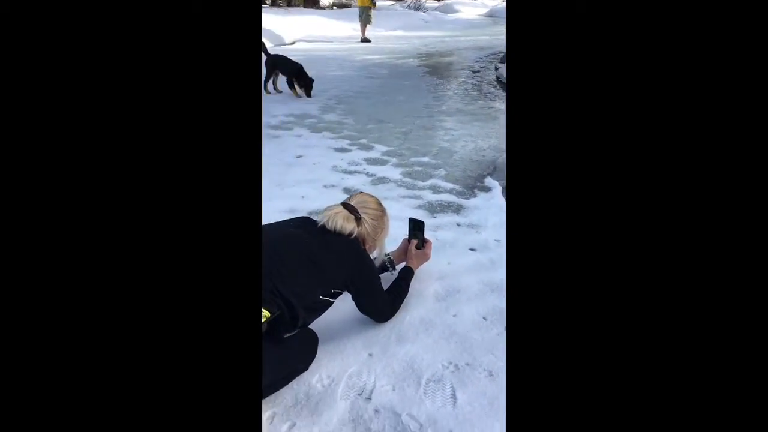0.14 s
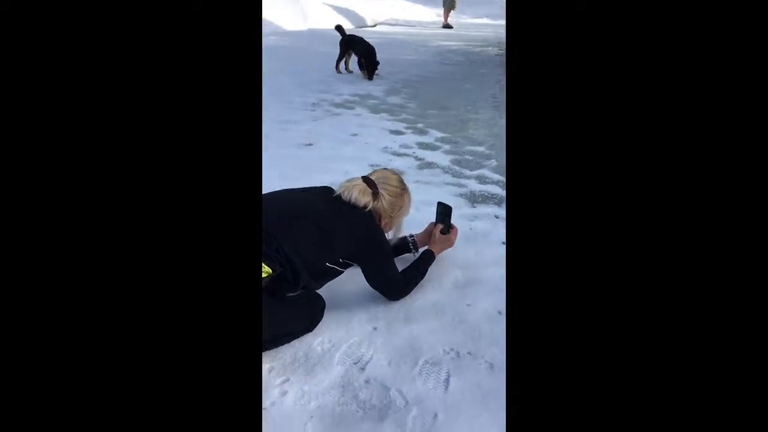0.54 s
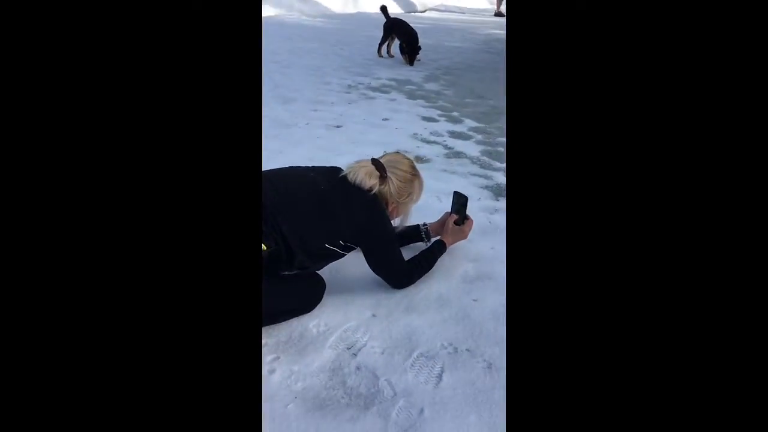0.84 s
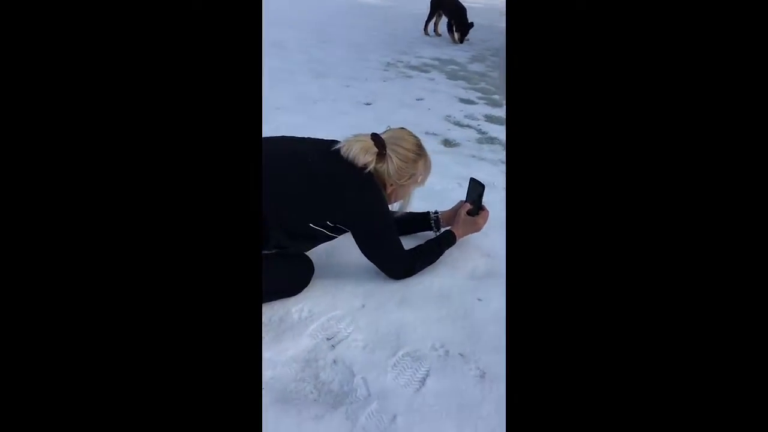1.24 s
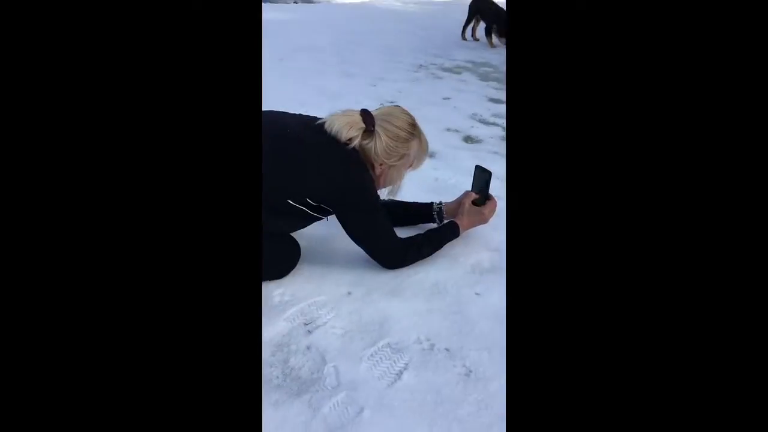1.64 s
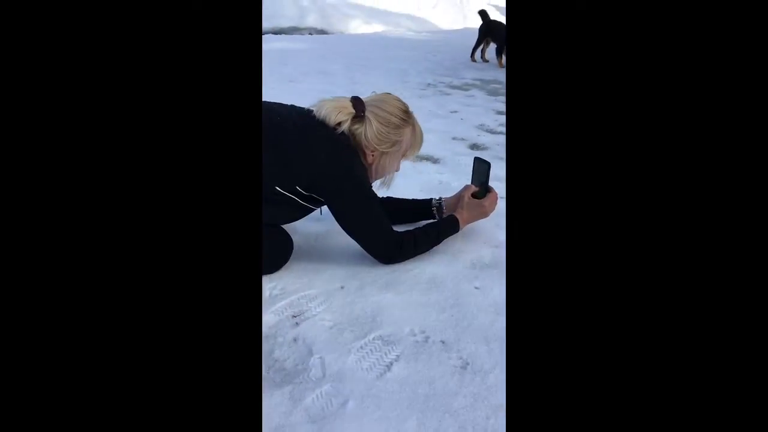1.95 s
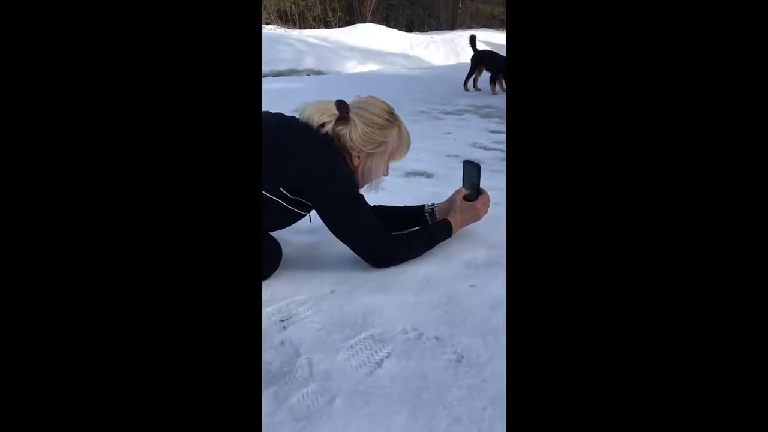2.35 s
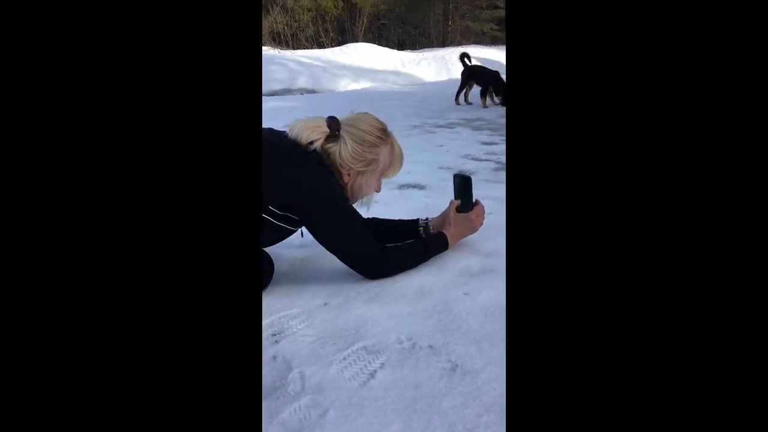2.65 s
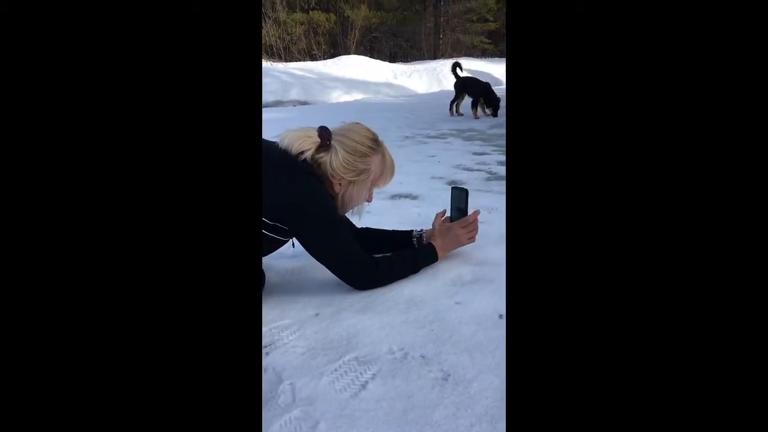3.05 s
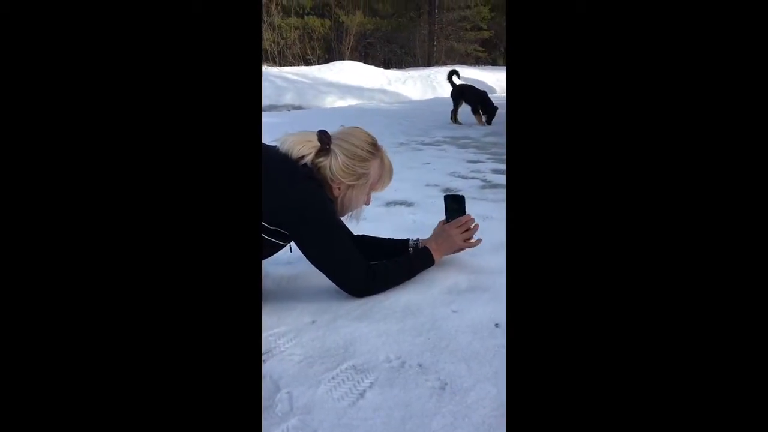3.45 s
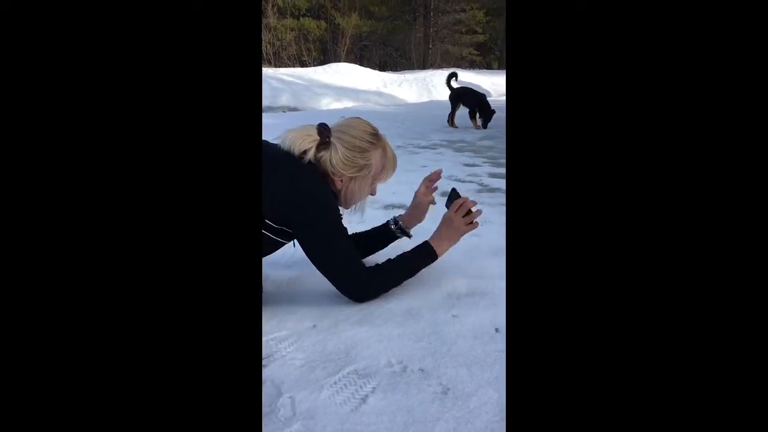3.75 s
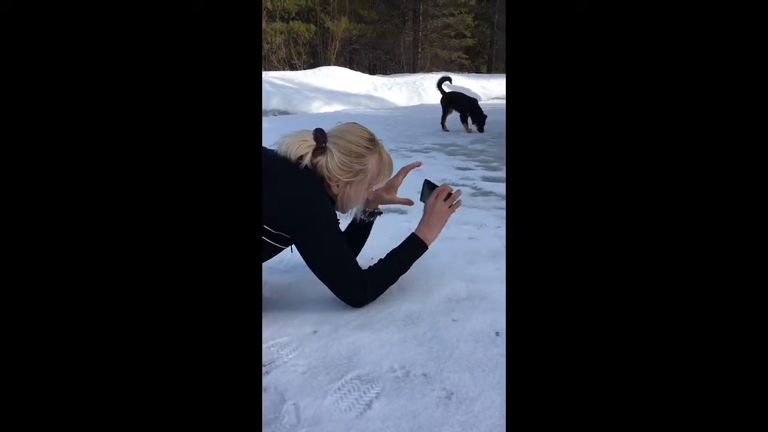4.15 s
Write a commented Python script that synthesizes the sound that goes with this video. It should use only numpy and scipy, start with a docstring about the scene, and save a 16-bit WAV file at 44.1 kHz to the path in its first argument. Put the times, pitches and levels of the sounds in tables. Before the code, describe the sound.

A dry, close, echo-free sound of crusty snow giving way underfoot: small crackles first, then stronger scrapes, one prominent snap, and a dense run of crunches. After the first two seconds the movement stops, leaving quiet open air, a gentle low wind rumble, very light scuffing, a smooth rub and a few minute clicks.

```python
"""A light wind and the hiss of the open air are heard first; at once boots shift their weight on crusty snow.
The crust scrapes and snaps grain by grain, gives way once with a sharp crack, and then the boots stand still.
Afterwards only light scuffs, a soft rub and a few tiny ticks are left.
Random grain impulses, ringing crumbs and coloured noise make the scrapes and collapses;
damped partials, noise bursts and falling tones make the cracks; filtered noise makes the rub, wind and air."""
import sys
import numpy as np
from scipy import signal
from scipy.io import wavfile
from scipy.ndimage import uniform_filter1d

SR = 44100
rng = np.random.default_rng(int(sys.argv[2]) if len(sys.argv) > 2 else 0)


def wav_record(signal):
    """Record a signal, one row per channel, as 16-bit PCM in the file named by sys.argv[1]."""
    frames = np.transpose(np.atleast_2d(signal))
    bounded = np.clip(frames, -1, 1)
    # unit amplitude maps onto the largest positive 16-bit level
    quanta = np.round(bounded * 32767).astype(np.int16)
    wavfile.write(sys.argv[1], SR, quanta)


N = 189453
TIME = np.arange(N) / SR

# Spectrum of crust being crushed: (frequency [Hz], relative density [dB])
CRUNCH_SPECTRUM = [(60, -21.5), (190, -3), (400, -8.5), (580, -4), (800, -7.5), (1130, -9.5), (1400, -10),
                   (1680, -8.5), (2100, -14.5), (2950, -15.5), (3700, -21.5), (4900, -25.5), (6300, -25.5),
                   (16000, -36.5)]
# Spectrum of ice crystals brushing past each other: (frequency [Hz], relative density [dB])
HISS_SPECTRUM = [(1500, -20), (3300, -5.5), (4900, -5), (6200, -1.5), (9000, -1), (10400, -2.5), (13000, 1),
                 (16000, -4)]
# Spectrum of the bright tick of a break: (frequency [Hz], relative density [dB])
EDGE_SPECTRUM = [(900, -11), (2100, -0.5), (2900, 6), (3700, -1), (4900, -3.5), (6500, -2), (10400, -7),
                 (16000, -3.5)]
# Load on the crust while the weight shifts: (time [s], load [dB])
LOAD_CURVE = [(0.0, -102), (0.11, -97), (0.24, -66), (0.42, -64), (0.49, -65.5), (0.619, -63),
              (0.76, -76.5), (0.89, -61), (0.99, -67), (1.22, -84), (1.28, -58.5), (1.37, -67.5),
              (1.46, -64.5), (1.69, -70), (1.798, -62), (1.939, -71), (2.069, -75), (2.151, -82.5)]


def amp(db):
    """Level law: decibels to an amplitude ratio."""
    return 10 ** (np.asarray(db) / 20)


def unit(x):
    """Power normalisation: scales to rms 1."""
    return x / np.sqrt(np.mean(x ** 2) + 1e-20)


def peaked(x):
    """Peak normalisation: scales to a peak of 1."""
    return x / (abs(x).max() + 1e-20)


def add(mix, s, sound):
    """Superposition: adds a sound to the mix at time s."""
    part = mix[max(0, round(s * SR)):][:len(sound)]
    part += sound[:len(part)]


def colour(x, points, size=4096):
    """Minimum-phase filtering: a causal response of unit energy with the given spectrum."""
    hz, db = np.transpose(points)
    bin_hz = abs(np.fft.fftfreq(size, 1 / SR))
    log_gain = np.log(amp(np.interp(np.log(bin_hz + 1), np.log(hz), db)))
    # the Hilbert transform of the log gain gives the phase of a causal filter
    spectrum = np.exp(signal.hilbert(log_gain).conj())
    pulse = np.fft.ifft(spectrum).real[:size // 2]
    return signal.fftconvolve(x, pulse / np.linalg.norm(pulse))[:len(x)]


def grains(per_s, spread_db, powder):
    """Shot noise: ice bonds break at random, a few big, many small, over a smooth share of powder."""
    sizes = amp(spread_db * np.minimum(rng.exponential(1, N), 3))
    signs = rng.choice([-1, 1], N)
    breaks = sizes * signs * (rng.random(N) < per_s / SR)
    return unit(unit(breaks) + powder * rng.standard_normal(N))


def splinter(t, decay_s, debris):
    """Brittle fracture: one sharp break with a decaying spray of smaller ones."""
    spray = debris * rng.standard_normal(len(t)) * np.exp(-t / decay_s)
    return (t == 0) + spray


def crumbs(centre_hz, spread_octaves, cycles, per_s, count=12):
    """Damped resonance: crumbs of many sizes break at random, each ringing briefly at its own pitch."""
    out, t = np.zeros(N), np.arange(1024) / SR
    for place in np.linspace(-1, 1, count):
        hz = centre_hz * 2 ** (spread_octaves * place)
        age = hz * t / cycles
        ring = age * np.exp(-2 * age) * np.sin(2 * np.pi * hz * t)
        breaks = grains(per_s / count, spread_db=3, powder=0)
        out += np.cos(place) * signal.oaconvolve(breaks, ring)[:N]  # the middle pitch is strongest
    return unit(out)


def outdoors(lump_db=1.0, air_db=-73.5):
    """Turbulent noise: lumpy low-frequency wind on the microphone over a steady hiss."""
    # Spectrum of the wind: (frequency [Hz], relative density [dB])
    wind_spectrum = [(18, -30.5), (40, 0.5), (80, 4), (130, -1), (190, -7), (270, -18), (450, -36.5),
                     (1200, -59)]
    # Spectrum of the open air: (frequency [Hz], relative density [dB])
    air_spectrum = [(30, 4.5), (300, 6), (600, 1), (1100, -1), (2000, -7), (4000, -8), (4900, -11.5),
                    (5700, -8), (10400, -9), (11400, -5), (16000, -7.5)]
    # Strength of the wind: (time [s], rms level [dB])
    gusts = [(0, -67), (0.1, -61.5), (0.3, -68), (0.75, -71.5), (1.2, -63), (1.6, -69), (1.997, -64),
             (2.55, -61), (3.15, -66), (3.68, -59.5), (3.95, -68), (4.3, -63)]
    s, gust_db = np.transpose(gusts)
    slow_noise = uniform_filter1d(rng.standard_normal(N), size=2000)
    lumps = unit(uniform_filter1d(slow_noise, size=1500))
    wind = unit(colour(rng.standard_normal(N), wind_spectrum) * amp(lump_db * lumps))
    air = amp(air_db) * colour(rng.standard_normal(N), air_spectrum)
    return wind * amp(np.interp(TIME, s, gust_db)) + air


def soft_rub(start_s=3.21, rise_s=0.087, top_db=-68):
    """Soft rub: smooth coloured noise swells and trails off."""
    # Spectrum of the soft rub: (frequency [Hz], relative density [dB])
    rub_spectrum = [(500, -17), (1300, -2.5), (2000, -7), (2500, -15), (3400, -10.5), (4800, -20.5),
                    (5900, -9.5), (7500, -23), (9200, -12.5), (16000, -26)]
    age = np.maximum(TIME - start_s, 0) / rise_s
    swell = (age * np.exp(1 - age)) ** 2
    return amp(top_db) * swell * colour(rng.standard_normal(N), rub_spectrum)


def ticks():
    """Impact: small hard things touch, too light to ring the crust."""
    # Tiny dry ticks: (time [s], peak level [dB])
    tick_events = [(0.5312, -32), (0.6604, -45), (2.597, -45), (2.752, -47.5), (3.7483, -51), (3.8, -43),
                   (3.854, -46), (3.867, -44), (3.9378, -38), (3.947, -44), (3.956, -46.5)]
    # Spectrum of a tick: (frequency [Hz], relative density [dB])
    tick_spectrum = [(1500, -8.5), (4500, -12), (6500, -5), (9000, -0.5), (12000, 0), (16000, 3.5)]
    out, t = np.zeros(N), np.arange(1024) / SR
    for s, db in tick_events:
        tick = colour(splinter(t, decay_s=0.0027, debris=0.25), tick_spectrum)
        add(out, s, amp(db) * peaked(tick))
    return out


def thumps(ring_s=0.0028):
    """Cavity resonance: the hollow booms briefly where the crust drops onto the snow beneath."""
    # Hollow thumps: (time [s], peak level [dB], pitch [Hz])
    thump_events = [(1.493, -48, 200), (1.855, -46, 204), (1.89, -42.5, 208)]
    out, t = np.zeros(N), np.arange(2048) / SR
    for s, db, hz in thump_events:
        boom = t * np.exp(-t / ring_s) * np.sin(2 * np.pi * hz * t)
        add(out, s, amp(db) * peaked(boom))
    return out


def load_db(settle_db_per_s=63):
    """Static loading: load on the crust at every sample, dying away when the boots come to rest."""
    s, db = np.transpose(LOAD_CURVE)
    return np.interp(TIME, s, db) - settle_db_per_s * np.maximum(TIME - s[-1], 0)


def scrapes(ease=0.56):
    """Sliding friction: pressure and speed swell, then ease off over the given share of each scrape."""
    # Scrapes of the sole, the late ones very light:
    # (start [s], length [s], swelling share of the length [1], pressure [dB], sliding speed [dB])
    strokes = [(0.044, 0.16, 0.062, -61, -69.5), (0.12, 0.2, 0.52, -59, -71.5),
               (0.301, 0.064, 0.55, -57, -90), (0.471, 0.094, 0.33, -55.5, -61),
               (0.589, 0.077, 0.3, -61, -75), (0.9, 0.06, 0.11, -83, -56), (0.923, 0.1, 0.22, -47, -59.5),
               (1.009, 0.16, 0.53, -45.5, -59.5), (1.312, 0.059, 0.64, -47, -58),
               (1.391, 0.051, 0.16, -53.5, -73), (1.159, 0.074, 0.43, -63, -68.5),
               (1.52, 0.45, 0.13, -82, -73.5), (1.563, 0.15, 0.79, -61.5, -99),
               (1.785, 0.16, 0.079, -55, -68.5), (2.269, 0.26, 0.34, -78, -71.5),
               (2.864, 0.18, 0.23, -82, -76.5), (3.031, 0.15, 0.42, -79, -90),
               (3.219, 0.71, 0.29, -81, -73.5), (3.38, 0.13, 1, -73.5, -87), (3.96, 0.15, 0.29, -72.5, -76),
               (4.216, 0.043, 0.36, -69, -96.5)]
    pressure, slide = np.zeros(N), np.zeros(N)
    for s, length, swell, pressure_db, slide_db in strokes:
        along = (TIME - s) / length
        stroke = np.clip(np.minimum(along / swell, (1 - along) / ease), 0, 1)
        pressure += amp(pressure_db) * stroke
        slide += amp(slide_db) * stroke
    return pressure, slide


def drag(crunch_db=-9, crackle_db=-11.5, sparkle_db=-16, fine_db=-4.0, coarse_db=-3.0,
         fine_share=0.348, coarse_share=0.53, hiss_db=1.0, clump_db=3.0, creep_db=-19):
    """Friction and fracture: weight breaks mostly fine crumbs, scrapes mostly coarse; sliding hisses."""
    # Crumbs of crust: (middle pitch [Hz], spread [octaves], ring scale [cycles], breaks [1/s])
    fine_crumbs = (1888, 0.82, 1.3, 700)
    coarse_crumbs = (1260, 0.29, 1.3, 520)
    load, (push, slip) = load_db(), scrapes()
    weight = amp(load)
    # independent sounds add in power
    pressure = np.hypot(push, weight)
    slide = np.hypot(slip, amp(load + creep_db))
    clumps = amp(clump_db * unit(uniform_filter1d(rng.standard_normal(N), size=260)))
    grind = unit(clumps * grains(per_s=2500, spread_db=2, powder=0.5))
    pops = grains(per_s=260, spread_db=3, powder=0)
    crunch = colour(amp(crunch_db) * grind + amp(crackle_db) * pops, CRUNCH_SPECTRUM)
    sparkle = amp(sparkle_db) * colour(pops, EDGE_SPECTRUM)  # each pop also ticks straight through the air
    fine = amp(fine_db) * np.hypot(weight, fine_share * push) * crumbs(*fine_crumbs)
    coarse = amp(coarse_db) * np.hypot(push, coarse_share * weight) * crumbs(*coarse_crumbs)
    hiss = amp(hiss_db) * colour(grains(per_s=2600, spread_db=8.0, powder=0.75), HISS_SPECTRUM)
    return pressure * (crunch + sparkle) + fine + coarse + slide * hiss


def crushes(edge_s=0.00072, creak_spread_octaves=0.089, creak_cycles=0.65):
    """Compaction: a patch collapses in dense grains, creaks as it packs and shoves the snow beneath."""
    # Patches of crust that cave in: (start [s], length [s], crunch level [dB], hiss level [dB],
    # low push level [dB], creak level [dB], creak pitch [Hz])
    patches = [(0.257, 0.024, -56.5, -87, -68, -49.5, 1030), (0.353, 0.022, -58, -81, -57.5, -57, 1310),
               (0.395, 0.016, -58, -62.5, -47, -53, 1220), (0.459, 0.02, -58, -84, -65, -67, 1300),
               (1.13, 0.012, -47.5, -63.5, -39.5, -52, 1100), (1.484, 0.013, -57, -49, -46, -68, 1100),
               (1.496, 0.0238, -48, -55.5, -45, -44, 1070), (1.519, 0.0155, -48, -65, -53, -50.5, 1000),
               (1.845, 0.027, -55.5, -65, -58.5, -58, 1450)]
    # Spectrum of the shove into the snow: (frequency [Hz], relative density [dB])
    push_spectrum = [(30, -43.5), (70, 12), (200, 9.5), (330, 0), (600, -0.5), (1000, -7.5), (2000, -33),
                     (5000, -56.5)]
    layers = []
    for spectrum in (CRUNCH_SPECTRUM, HISS_SPECTRUM, push_spectrum):
        layers.append(colour(grains(per_s=5000, spread_db=1.0, powder=0.078), spectrum))
    out = np.zeros(N)
    for s, length, *levels_db, creak_hz in patches:
        gate = np.clip(np.minimum(TIME - s, s + length - TIME) / edge_s, 0, 1)
        creak = crumbs(creak_hz, creak_spread_octaves, creak_cycles, per_s=1700, count=3)
        out += gate * sum(amp(db) * layer for db, layer in zip(levels_db, layers + [creak]))
    return out


def small_cracks(per_s=55, snap_db=9, spread_db=2, tick_db=-10, thud_db=-16.5,
                 middle_hz=1520, spread_octaves=0.28):
    """Load-driven fracture: random cracks while weight shifts, snapping louder under heavier load."""
    shifting_s, load = LOAD_CURVE[-1][0], load_db()
    rows = []
    for k, (when, size, pitch) in enumerate(rng.random((200, 3))):
        s = (k + 2 * when) / per_s
        if s < shifting_s:
            snap = load[round(s * SR)] + snap_db + spread_db * (2 * size - 1)
            ring_hz = middle_hz * 2 ** (spread_octaves * (2 * pitch - 1))
            # tick and thud are set against the snap
            rows.append((s, snap, ring_hz, snap + tick_db, snap + thud_db))
    return rows


def crust_ring(t, ring_hz, low_ratio=0.616, high_ratio=1.2):
    """Plate resonance: a break excites damped partials of the crust within a band around its pitch."""
    # Partials of the crust ahead of the band-pass: (multiple of ring pitch [1], level [dB], t60 [s])
    partials = [(.9, 2, 0.006), (1.15, 2, 0.0046), (2.149, -0.5, 0.0043)]
    ring = np.zeros(len(t))
    for k, db, t60 in partials:
        hz = ring_hz * k * rng.uniform(1.0, 1.03)
        ring += amp(db - 60 * t / t60) * np.sin(2 * np.pi * hz * t)
    # a small plate radiates little below its ring, and the snow muffles what lies above
    band_hz = [low_ratio * ring_hz, high_ratio * ring_hz]
    ring = signal.sosfilt(signal.butter(3, band_hz, "bandpass", fs=SR, output="sos"), ring)
    return signal.fftconvolve(ring, splinter(t, decay_s=.003, debris=.03))[:len(t)]


def bending_wave(t, top_hz=700, end_hz=150, glide_s=.002, decay_s=0.0042, rise_s=0.00042):
    """Dispersion: the low notes of a bending wave arrive last, so the thud glides down."""
    # the glide starts top_hz or slightly more above end_hz
    bend_hz = end_hz + top_hz * rng.uniform(1.0, 1.1) * np.exp(-t / glide_s)
    envelope = np.exp(-t / decay_s) * (1 - np.exp(-(t / rise_s) ** 2))
    return np.sin(2 * np.pi * np.cumsum(bend_hz) / SR) * envelope


def muffled_edge(t, buried_hz=8800, buried_octaves=1.0):
    """Absorption: snow dulls a bright tick, from buried_hz for the deepest up to buried_octaves higher."""
    edge = colour(splinter(t, decay_s=.0012, debris=.22), EDGE_SPECTRUM)
    cutoff_hz = min(buried_hz * 2 ** (buried_octaves * rng.random()), .45 * SR)
    return signal.sosfilt(signal.butter(2, cutoff_hz, fs=SR, output="sos"), edge)


def cracks():
    """Brittle fracture: each crack rings the crust, ticks and sends out a bending wave."""
    # Single cracks, loud and faint:
    # (time [s], snap peak [dB], ring pitch [Hz], bright tick peak [dB], thud peak [dB])
    single_cracks = [(0.136, -46, 1110, -49.5, -44.5), (0.2495, -55, 1820, -44, -56),
                     (0.355, -42, 1240, -44, -39), (0.3894, -37, 1520, -43, -59),
                     (0.4067, -42, 1310, -58, -44.5), (0.4431, -43.5, 1590, -54, -64),
                     (0.4691, -42, 1160, -40.5, -56), (0.4732, -37, 1390, -39, -60),
                     (0.5238, -42.5, 1680, -40.5, -56), (0.5313, -42.5, 1730, -42.5, -65),
                     (0.5687, -42.5, 1410, -48, -56.5), (0.6179, -41.5, 1830, -54, -56),
                     (0.6421, -45.5, 1100, -43.5, -53.5), (0.7097, -46, 1460, -51, -65),
                     (0.7178, -47.5, 1700, -49, -57.5), (0.794, -55, 1610, -47, -64),
                     (0.827, -44.5, 1930, -48.5, -60), (0.838, -46, 1570, -66, -74),
                     (0.858, -39.5, 1780, -46, -61), (0.8867, -28, 1600, -36.5, -39.5),
                     (0.9686, -40.5, 1180, -53, -46.5), (1.0908, -30, 1280, -52, -48),
                     (1.1067, -30.5, 1890, -32.5, -45), (1.131, -12.5, 1400, -26.5, -23),
                     (1.1425, -53, 1230, -41, -39), (1.1811, -42.5, 1200, -40.5, -60),
                     (1.2558, -43, 1520, -41.5, -59), (1.2673, -38, 1464, -44, -71),
                     (1.2698, -41.5, 1410, -46, -62), (1.3086, -35, 1390, -40, -50.5),
                     (1.3268, -38, 1400, -48, -73), (1.3452, -30, 1220, -31, -49),
                     (1.388, -35, 1650, -37.5, -54), (1.3948, -33.5, 1420, -40, -49.5),
                     (1.4102, -34, 1610, -34, -53), (1.4138, -40, 1410, -43, -55),
                     (1.418, -51, 1540, -43, -62), (1.4475, -46, 1400, -53, -54),
                     (1.452, -42.5, 1700, -45, -64), (1.487, -52, 980, -48, -37.5),
                     (1.493, -34.5, 1020, -48, -53), (1.5154, -31, 956, -31.5, -54),
                     (1.755, -44, 1260, -48, -59.5), (1.7758, -41, 1860, -43, -63),
                     (1.7821, -36.5, 1630, -32.5, -60), (1.8135, -40, 1810, -43, -60),
                     (1.8345, -42, 1880, -40.5, -59), (1.8477, -35.5, 1280, -45, -60),
                     (1.8565, -38, 1050, -37, -66), (1.889, -33, 1380, -36.5, -48),
                     (1.9064, -33, 1920, -34, -56), (1.9101, -38, 1500, -41.5, -51),
                     (1.962, -59, 1440, -55, -62), (2.0716, -53.5, 1400, -53.5, -69),
                     (2.403, -61.5, 1180, -66.5, -74), (4.1568, -61, 1567, -59, -81.5)]
    out, t = np.zeros(N), np.arange(2048) / SR
    for s, snap, ring_hz, tick, thud in single_cracks + small_cracks():
        ring = amp(snap) * peaked(crust_ring(t, ring_hz))
        bend = amp(thud) * peaked(bending_wave(t))
        edge = amp(tick) * peaked(muffled_edge(t))
        add(out, s, ring + edge + bend)
    return out


def scene():
    """Free field: open snow gives no echo, so everything arrives dry and adds up."""
    background = outdoors() + soft_rub()
    return (background + ticks() + thumps() + drag() + crushes() + cracks())[None]


def record(dry, rumble_hz=32, top_hz=16100):
    """Band limiting: the microphone sheds the deepest rumble, the recorder the highest treble."""
    dry = signal.sosfilt(signal.butter(2, rumble_hz, "highpass", fs=SR, output="sos"), dry)
    low_pass = signal.firwin(401, top_hz, window=("kaiser", 8), fs=SR)
    return signal.oaconvolve(dry, low_pass[None], "same")


dry = scene()
out = record(dry)
wav_record(out)
```